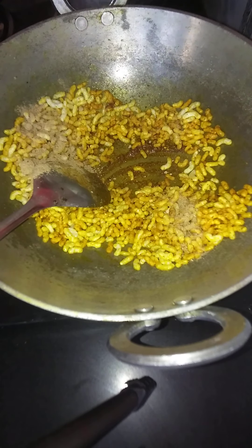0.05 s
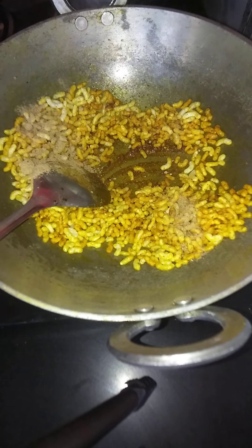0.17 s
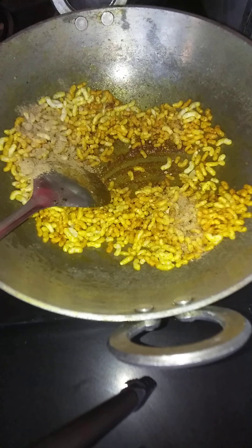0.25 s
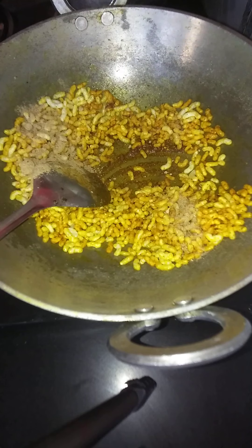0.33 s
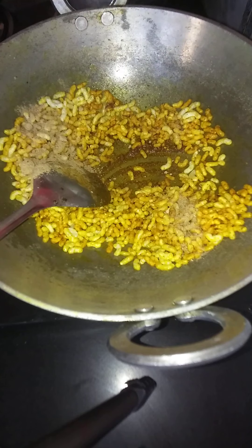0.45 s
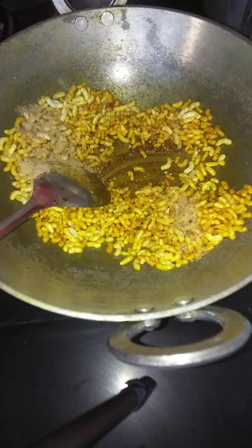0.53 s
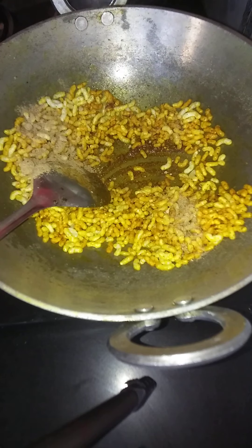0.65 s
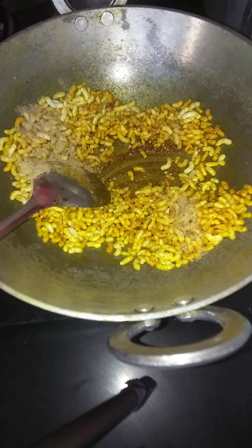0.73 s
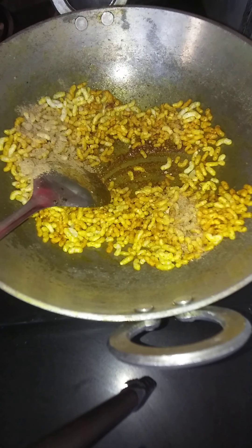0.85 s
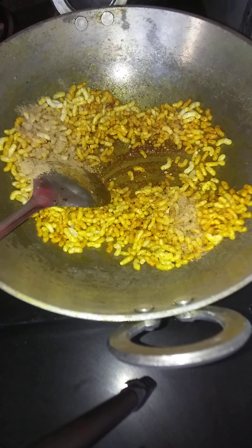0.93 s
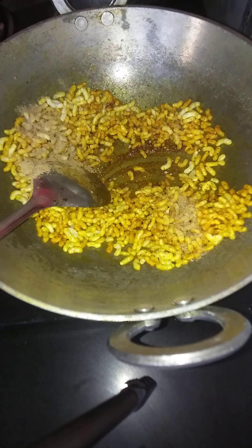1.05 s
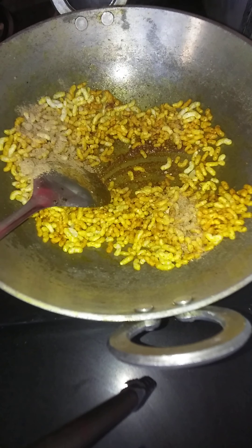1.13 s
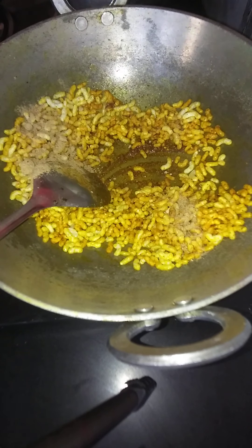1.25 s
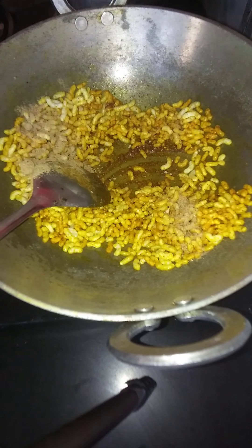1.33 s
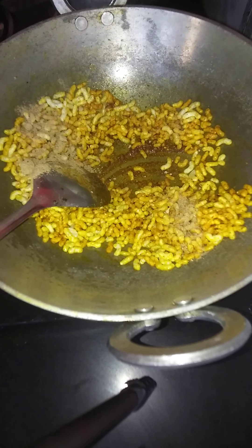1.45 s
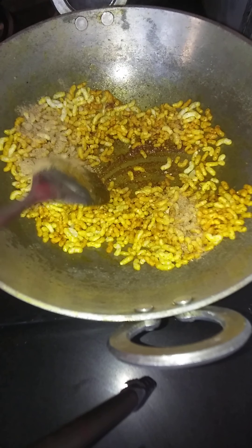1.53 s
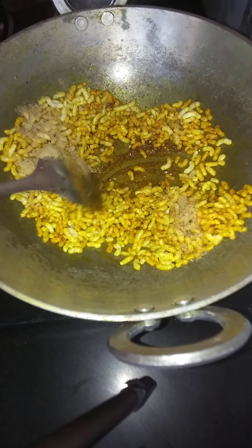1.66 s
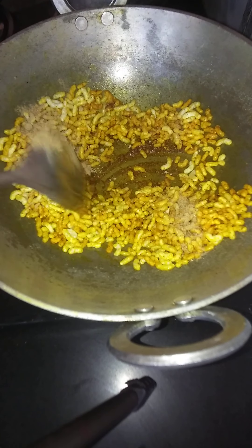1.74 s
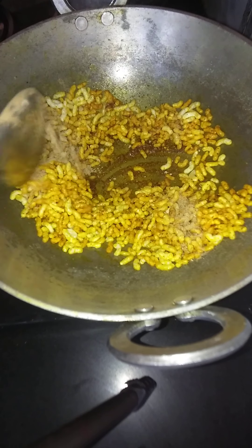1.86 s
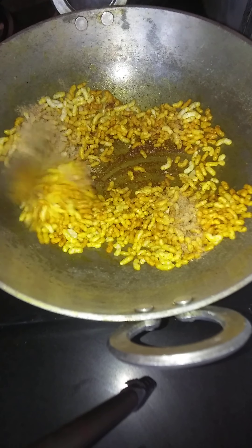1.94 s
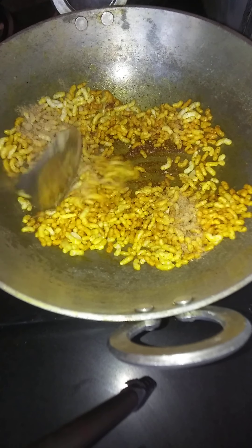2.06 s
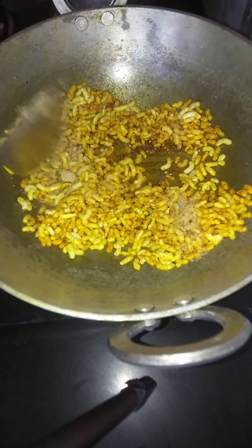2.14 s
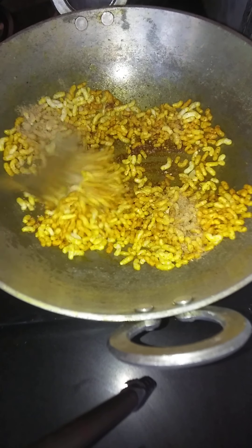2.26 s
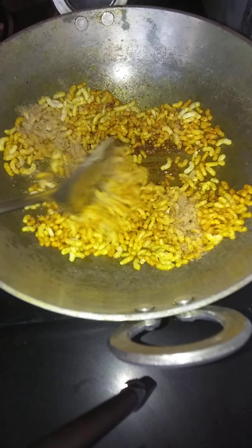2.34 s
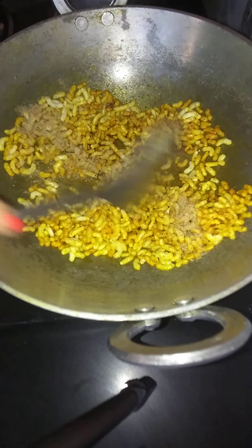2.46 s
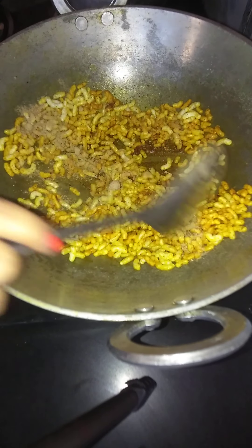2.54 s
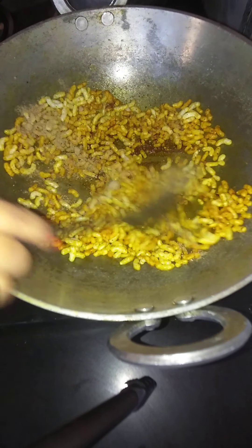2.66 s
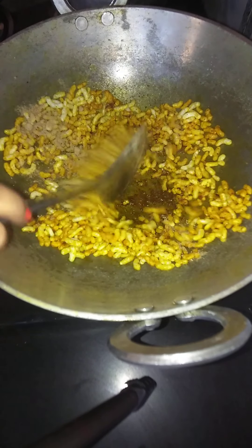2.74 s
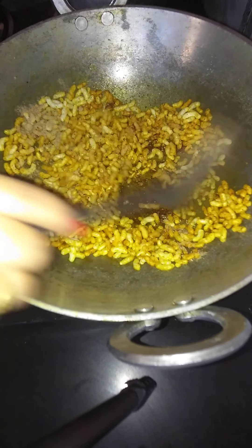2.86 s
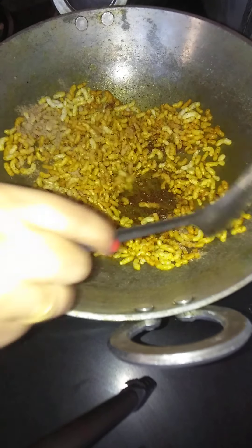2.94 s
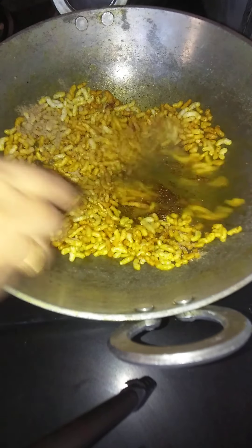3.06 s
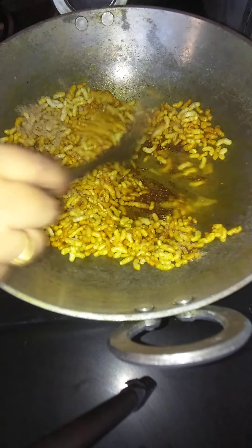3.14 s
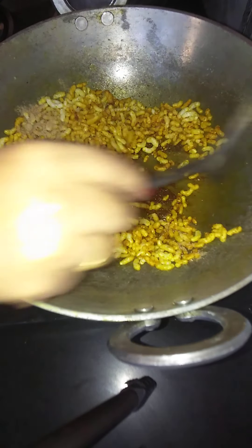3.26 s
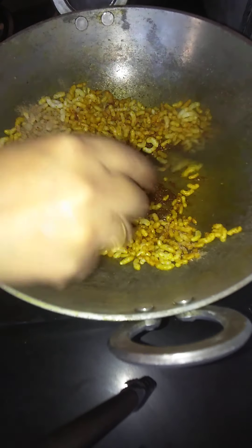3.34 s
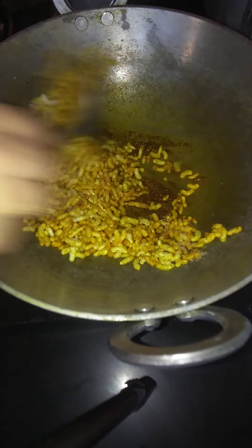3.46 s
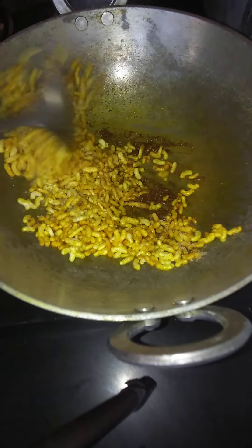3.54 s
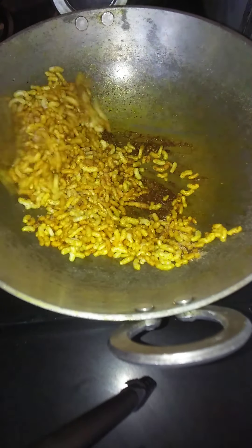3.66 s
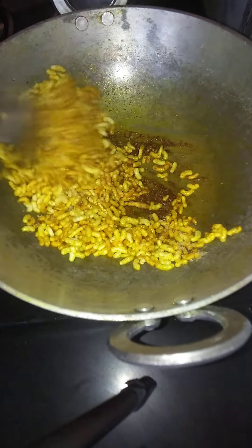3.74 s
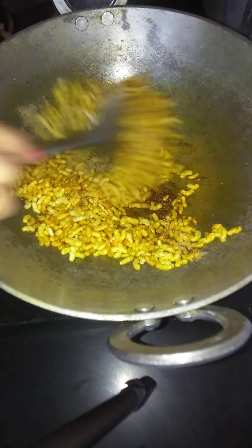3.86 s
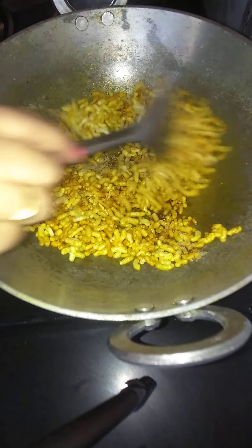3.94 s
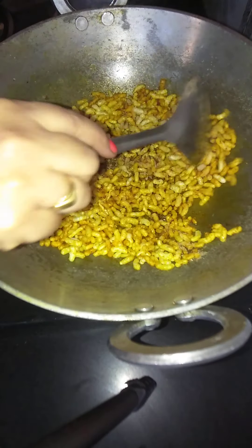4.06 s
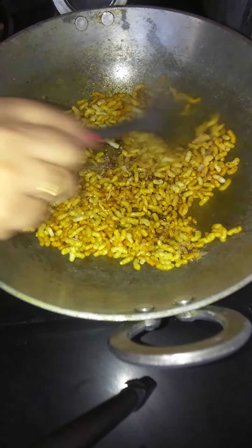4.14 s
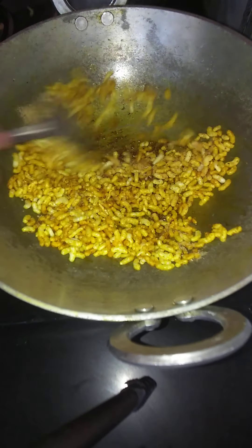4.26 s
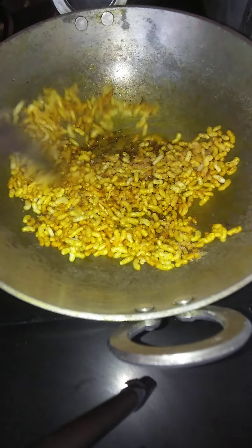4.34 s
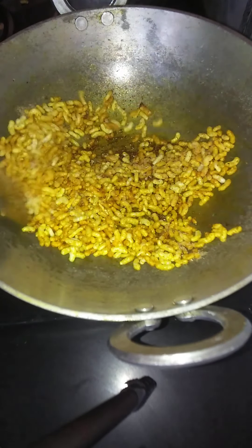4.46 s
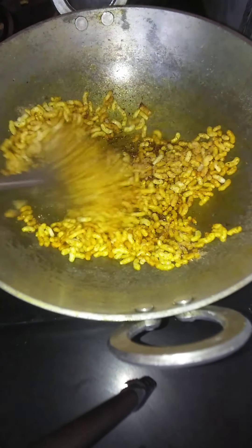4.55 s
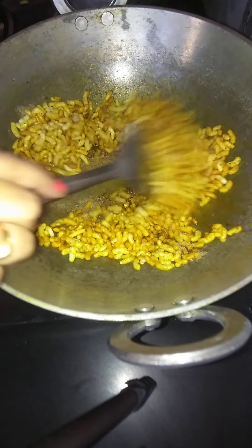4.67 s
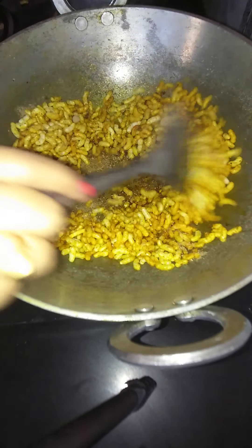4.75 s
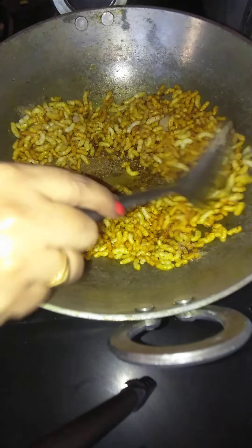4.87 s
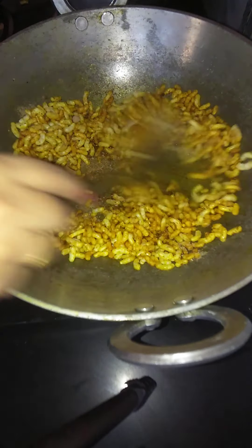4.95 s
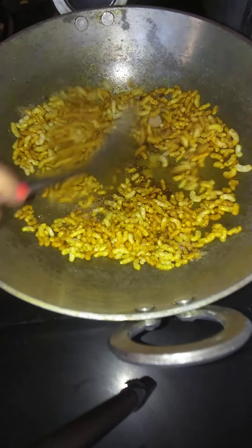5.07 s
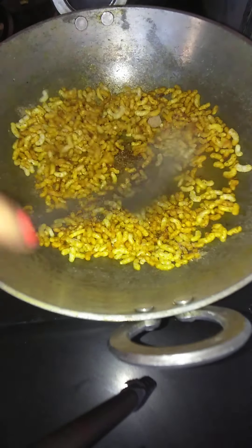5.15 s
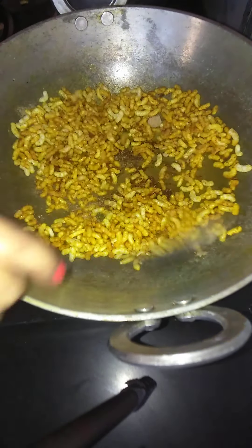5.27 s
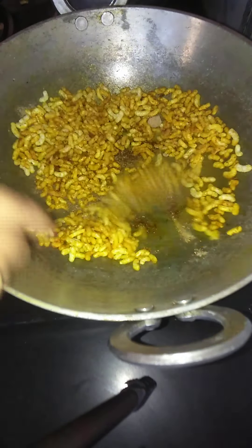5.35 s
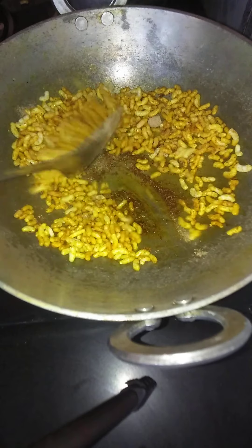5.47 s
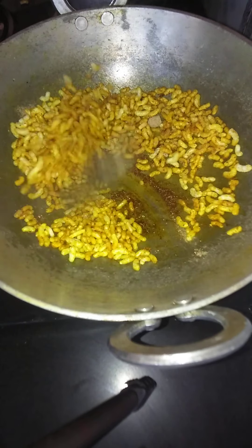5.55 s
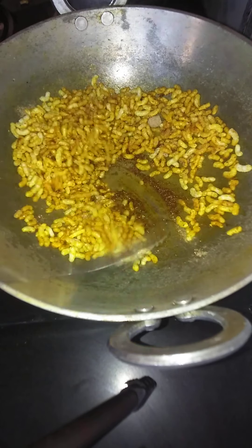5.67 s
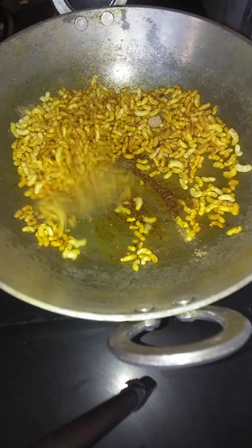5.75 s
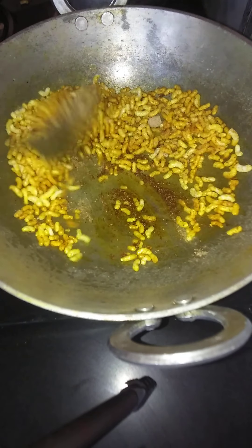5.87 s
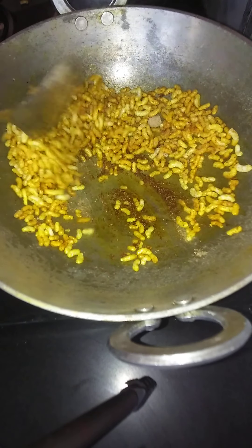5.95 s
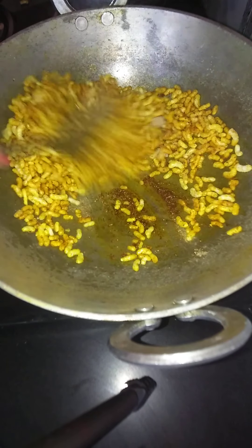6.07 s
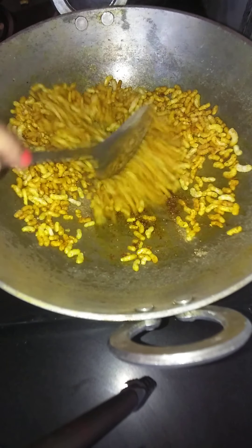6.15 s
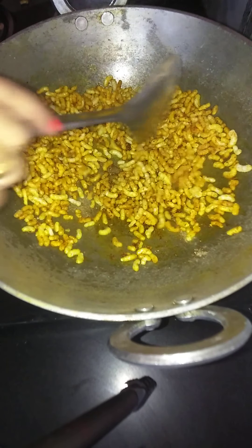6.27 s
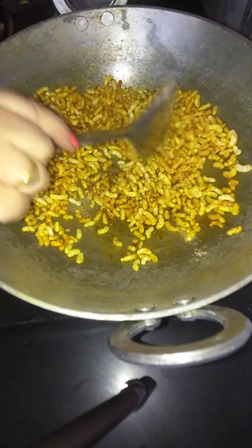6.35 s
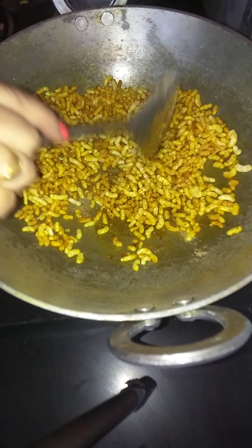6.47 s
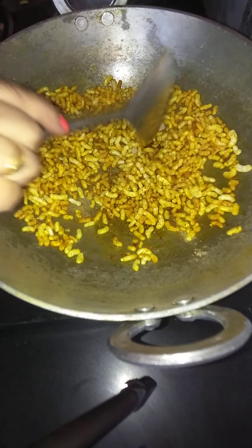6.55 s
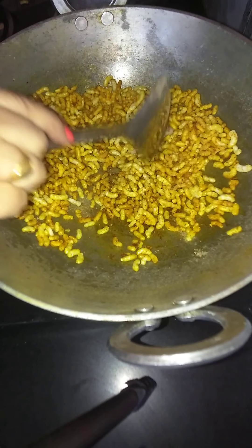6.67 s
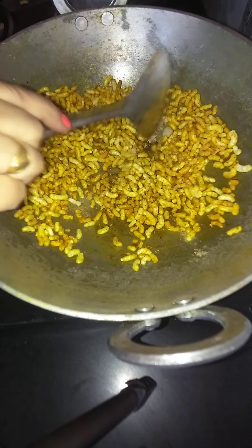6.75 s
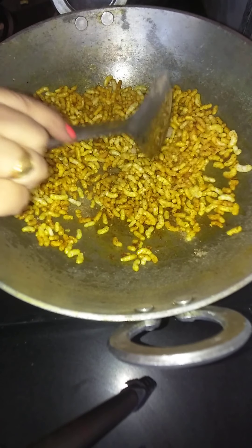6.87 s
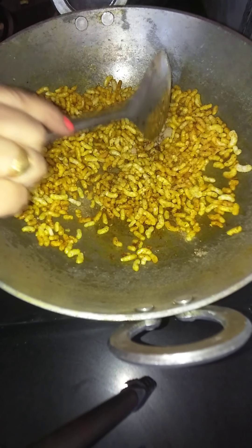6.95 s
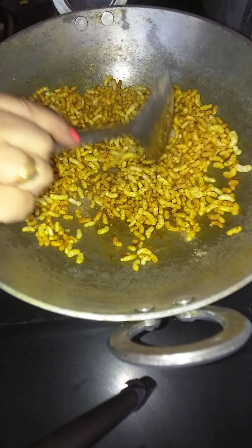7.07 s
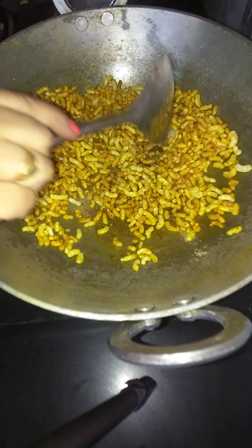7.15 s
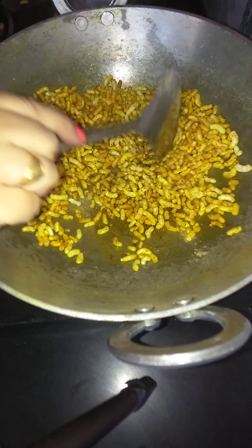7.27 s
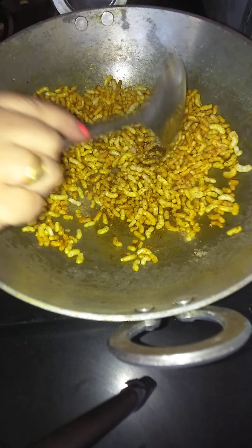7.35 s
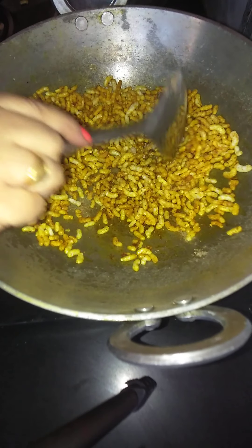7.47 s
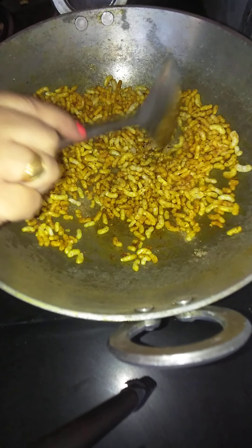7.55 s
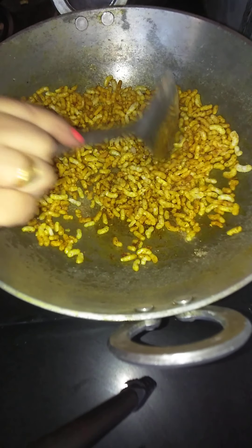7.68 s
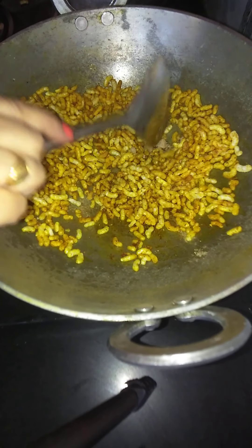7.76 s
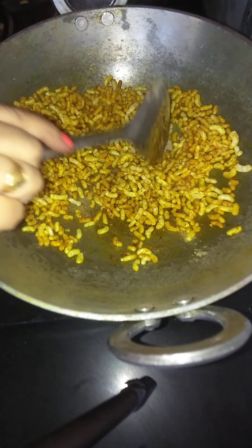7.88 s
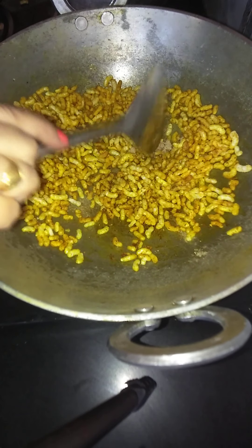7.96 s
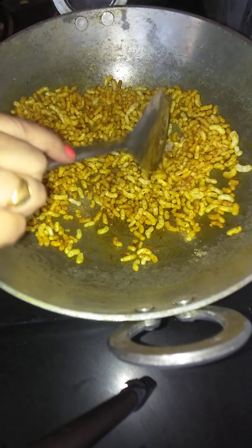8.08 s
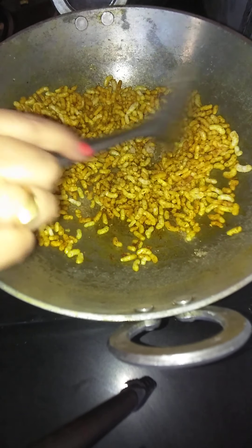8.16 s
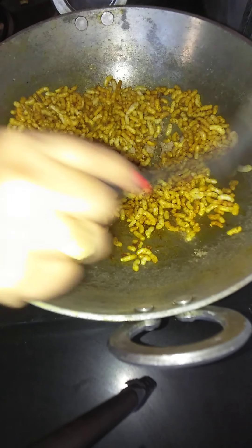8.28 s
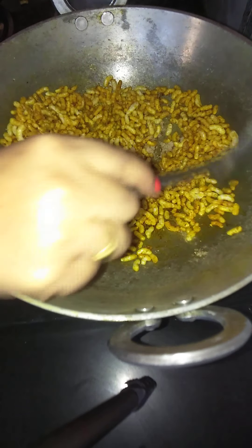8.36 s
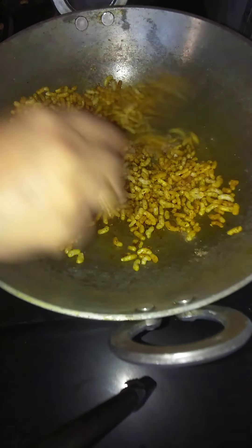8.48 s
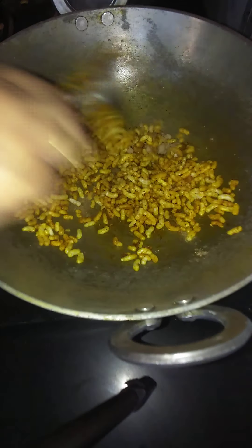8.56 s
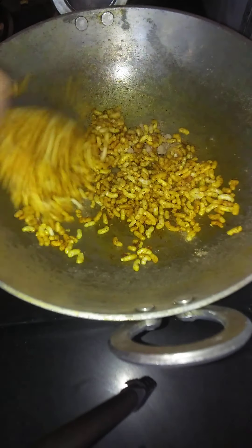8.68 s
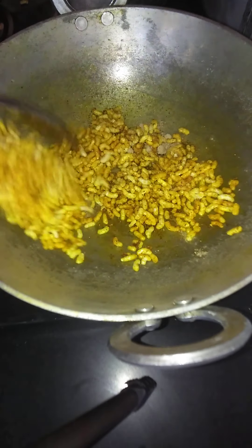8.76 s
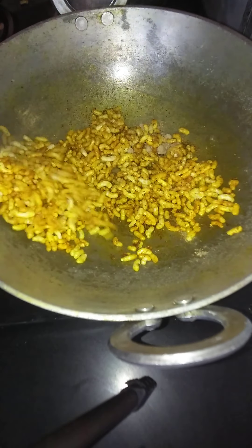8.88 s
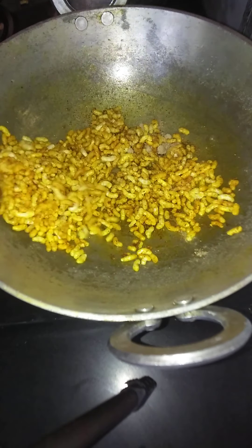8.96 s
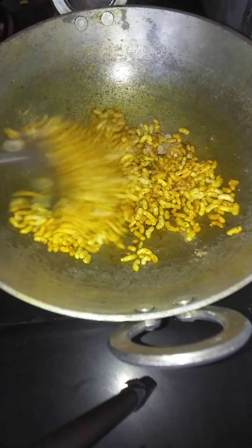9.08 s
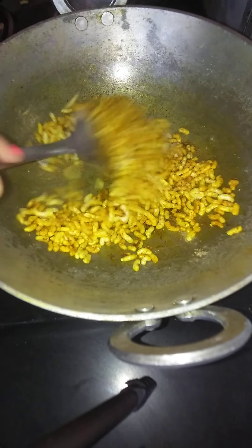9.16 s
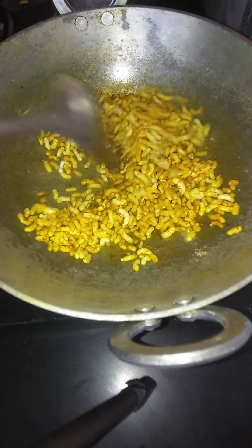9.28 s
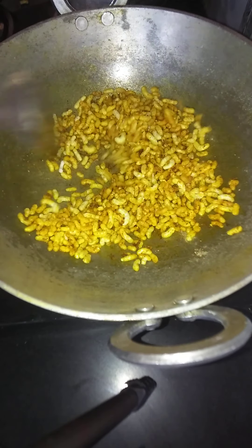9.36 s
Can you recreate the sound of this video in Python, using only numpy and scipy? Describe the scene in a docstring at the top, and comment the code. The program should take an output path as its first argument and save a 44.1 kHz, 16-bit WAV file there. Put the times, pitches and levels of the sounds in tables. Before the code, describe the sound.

Close view of a metal spoon in a wide steel pan of dry grains. Quiet taps come first, then a bright ringing clank around two seconds, followed by uneven scrapes and gritty swishes. After a tiny falling chirp a second hard clank lands past the middle, then quick dull taps and more stirring. A faint flame rumble and room hush sit beneath; small kitchen, narrow, muffled-treble phone microphone.

```python
"""A steel spoon stirs dry roasted grains in a deep metal pan on a gas ring, in a small kitchen.
From the start a soft hush (coloured noise) and the flame's rumble (noise ringing low modes) run on.
Over them the spoon knocks and drags: bursts and gritty contacts ring bowl, spoon, wall and grains.
One knock stands out near 2 s. At about 6.5 s comes a falling whistle, a tone sliding down in pitch,
and a strong knock lands as the whistle ends; the stirring goes on to the end."""
import sys
import numpy as np
from scipy import signal
from scipy.fft import rfft, irfft, next_fast_len
from scipy.io import wavfile
from scipy.ndimage import uniform_filter1d

SR = 44100
rng = np.random.default_rng(int(sys.argv[2]) if len(sys.argv) > 2 else 0)


def pcm_store(signal):
    """Save signal as 16-bit PCM."""
    levels = np.round(np.clip(np.atleast_2d(signal), -1, 1) * 32767)
    wavfile.write(sys.argv[1], SR, levels.astype(np.int16).T)


N = 415545   # length of the scene [samples]

# All levels here are starting points: each source adds its own trim and chance.
# Colour of the room hush: (frequency [Hz], relative level per Hz [dB])
HUSH_COLOUR = [(15, -55), (25, -23.5), (67, 5.5), (108, 1.5), (239, -12), (343, -18), (876, -13.5),
               (2980, -22.5), (3980, -23.5), (6280, -55.5), (7800, -50.5), (10100, -95.5), (17200, -120)]
# Strength of the gas flame: (time [s], level [dB])
FLAME_LEVEL = [(0, -61.5), (.25, -68), (.5, -51), (1.05, -55.5), (1.2, -70.5), (1.9, -56), (2.15, -43),
               (2.4, -64), (2.75, -60), (3.3, -59.5), (3.8, -57), (4.6, -51), (4.85, -59), (5.7, -49),
               (6.0, -55), (6.7, -44), (6.9, -54.5), (7.4, -55), (8.3, -52), (8.47, -43), (8.7, -75),
               (8.95, -57.5), (9.26, -46.5), (9.42, -62)]
# Modes of the air under the pan, before damping: (frequency [Hz], width [Hz], level [dB])
FLAME_MODES = [(69.6, 41, -22), (102, 45.7, 10.5), (127.6, 8.3, -0.5)]
# Falling whistle: (time [s], pitch [Hz], level [dB])
WHISTLE = [(6.51, 6570, -100), (6.525, 6300, -65), (6.57, 5210, -51.5), (6.61, 4200, -55.5),
           (6.66, 2780, -41.5), (6.675, 2450, -100)]
# How long the kitchen echo takes to fall by 60 dB: (frequency [Hz], time [s])
ECHO_TIMES = [(150, 0.65), (500, 0.39), (1500, 0.31), (4000, 0.39), (7500, 0.12)]
# Low modes of the pan bowl, damped by the food: (frequency [Hz], width [Hz], level [dB])
BOWL = [(223, 28, -2), (271.5, 33, 5), (308, 28, -6), (392.6, 31, 2), (509, 98, -11.5), (558, 70, -5.5),
        (668, 15, -10.5), (730, 27, -6), (885, 100, -4.5), (999, 58, -7.5), (1120, 51, -14.5)]
# Modes of the spoon: (frequency [Hz], width [Hz], level [dB])
SPOON = [(2180, 70, -15.5), (2740, 35, -16.5), (3305, 130, 0.5), (3843, 29, -8), (3966, 63, 4),
         (4144, 35, -6), (4960, 40, 1), (5020, 45, -11.5), (6014, 28, -7), (6090, 50, -9), (7200, 110, -14)]
# Modes of the bare pan wall: (frequency [Hz], width [Hz], level [dB])
WALL = [(2365, 35, -8.5), (2520, 45, -8.5), (3560, 27, -8.5), (3907, 50, -10), (4345, 35, -5.5),
        (4610, 25, -5.5), (5115, 56, 1.5), (5490, 44, -1.5), (5500, 77, -1.5), (5840, 36, -4),
        (6100, 33, -2), (6550, 55, -6.5), (7330, 150, -3)]
# Broad resonances of grains tumbling on steel: (frequency [Hz], width [Hz], level [dB])
GRAINS = [(645, 300, -0.5), (966, 220, -6), (1180, 550, 3), (1560, 840, -12), (2150, 300, -2.5),
          (2400, 820, -1), (2780, 400, -10), (3770, 170, -4), (4500, 150, -3.5), (5230, 1400, -17),
          (6700, 4100, -16)]
# Knocks: (time [s], crack peak [dB], bowl boom [dB], crack centre [Hz], spoon ring [dB],
#          wall ring [dB], contact [ms])
KNOCKS = [(0.035, -36, -63, 950, -80, -69, 14), (0.254, -21.5, -64, 760, -77, -81, 11),
          (0.541, -45, -69, 2900, -71, -87, 22), (0.85, -24, -61, 626, -49.5, -65, 10),
          (1.017, -22, -47, 1180, -50, -66, 12), (1.131, -43, -71, 2690, -54, -52.5, 3.2),
          (1.382, -20.5, -39.5, 1300, -52, -62, 6.7), (1.576, -30, -75, 2660, -54, -54, 13),
          (1.935, -56, -66, 1070, -51, -47.5, 7.8), (1.998, -33, -40.5, 896, -51, -51, 4.9),
          (2.038, -0.5, -22, 1010, -10, -50, 3.9), (2.323, -28, -44, 802, -50, -63, 13),
          (2.535, -45, -63.5, 860, -47, -53.5, 11), (2.734, -52, -48.5, 2500, -47, -62, 6),
          (2.823, -42, -56.5, 2900, -52, -50.5, 8.9), (3.195, -51.5, -69, 2180, -45, -39.5, 6.5),
          (3.362, -13, -26, 2310, -48.5, -26, 6.3), (3.678, -49, -47, 651, -64, -47, 5.1),
          (3.741, -31, -70, 2870, -46, -68, 6.9), (3.761, -28, -35, 923, -63, -70, 15),
          (3.968, -27.5, -84.5, 2330, -63, -70, 12), (4.018, -64, -50, 832, -52.5, -63, 7.7),
          (4.126, -29, -57, 2870, -51, -66, 5.7), (4.147, -35, -35, 1040, -50, -49.5, 3.9),
          (4.164, -28, -30, 950, -67, -70, 8.6), (4.228, -26.5, -36, 990, -49.5, -51, 14),
          (4.496, -40, -46.5, 896, -68, -41, 6), (4.566, -15.5, -27.5, 1040, -36.5, -32, 11),
          (4.912, -47, -38.5, 800, -55.5, -65, 13), (4.999, -45.5, -42, 800, -58, -58, 10.4),
          (5.125, -56.5, -45, 636, -80.5, -81, 5.1), (5.306, -16.5, -33, 2130, -41, -32.5, 15),
          (5.712, -11.5, -25.5, 780, -47, -30, 6.3), (5.725, -23, -26, 720, -43, -35, 8.8),
          (6.112, -60.5, -43, 840, -62, -49, 5.5), (6.405, -29.5, -35.5, 1570, -39, -42, 8.2),
          (6.661, -3, -16, 696, -20.5, -19.5, 9.3), (6.994, -52, -44.5, 855, -61, -75.5, 13),
          (7.073, -26, -21.5, 724, -41.5, -66.5, 1.9), (7.109, -33, -38.5, 708, -56, -78, 9.5),
          (7.209, -45.5, -47.5, 616, -59, -69, 6.5), (7.285, -45, -34.5, 920, -49.5, -68, 4.2),
          (7.367, -33.5, -38.5, 890, -54.5, -72, 7.9), (7.463, -50, -36, 740, -45.5, -46, 3.6),
          (7.51, -35.5, -38.5, 799, -76.5, -73, 8.3), (7.565, -38, -44, 1500, -69, -77, 7.4),
          (7.659, -13.5, -21, 727, -38, -45, 10.4), (7.754, -34, -38, 692, -63, -73, 6.4),
          (7.863, -42.5, -38, 786, -50.5, -54.5, 5.3), (7.96, -38, -43, 842, -65, -74, 9.5),
          (8.064, -19, -20.5, 716, -36, -45.5, 4.4), (8.165, -37, -45, 1500, -61, -65, 7),
          (8.287, -42, -46.5, 1034, -67, -70, 7.5), (8.369, -15, -22.5, 2450, -32.5, -33.5, 13),
          (8.644, -13.5, -34.5, 1090, -51, -33.5, 3.6), (8.914, -66.5, -75, 705, -51.5, -74, 4.1),
          (9.039, -34.5, -65, 880, -44.5, -60.5, 6.5), (9.088, -23, -31, 611, -40, -37.5, 7.3),
          (9.137, -25, -34, 1080, -23, -52, 12)]
# Strokes of the spoon: (start [s], rise [s], hold [s], bowl boom [dB], grain rattle [dB],
#                        spoon ring [dB], wall ring [dB])
STROKES = [(0.252, .01, 0.02, -62, -60, -85, -85), (0.84, 0.031, 0.015, -41.5, -44.5, -52.5, -77),
           (0.995, 0.016, 0.029, -48, -45.5, -47.5, -78), (1.62, 0.039, 0.21, -60, -64.5, -72, -86),
           (1.924, 0.073, 0.038, -43, -51, -56, -54), (2.043, 0.0096, 0.047, -32, -28.5, -29.5, -53),
           (2.239, 0.031, 0.08, -46, -51.5, -50, -59.5), (2.633, 0.029, 0.097, -54, -53, -47.5, -53.5),
           (2.958, .05, .14, -46, -51, -52.5, -55), (3.364, 0.034, 0.056, -30, -39.5, -37, -33),
           (3.723, 0.039, 0.045, -37, -45.5, -49.5, -56), (3.8, 0.02, 0.16, -53, -59, -58, -57.5),
           (4.004, 0.023, 0.029, -53, -56, -65, -68), (4.117, 0.019, 0.044, -38.5, -44.5, -58, -58),
           (4.201, 0.037, 0.021, -35.5, -48, -51.5, -52.5), (4.35, 0.042, 0.037, -61, -64, -73.5, -66.5),
           (4.474, 0.022, 0.034, -38.5, -50.5, -67, -49), (4.557, 0.035, 0.012, -31, -31.5, -25.5, -47),
           (4.716, 0.023, 0.04, -46, -54.5, -64.5, -59), (4.86, .04, .13, -41, -55.5, -52, -54.5),
           (5.29, 0.056, 0.048, -40.5, -42, -32.5, -40.5), (5.362, 0.018, 0.018, -51, -58, -33, -44.5),
           (5.538, 0.017, 0.013, -47.5, -80, -72.5, -52.5), (5.706, 0.0088, 0.062, -56, -43, -39, -44.5),
           (5.906, 0.014, 0.034, -50, -64.5, -65, -78.5), (6.014, 0.021, 0.18, -54, -61.5, -55, -61),
           (6.675, 0.011, 0.039, -34, -37, -46.5, -43), (6.802, 0.027, 0.034, -39.5, -57.5, -61.5, -61),
           (7.077, 0.014, 0.047, -37, -61, -69.5, -78), (7.247, 0.037, 0.035, -37, -48.5, -74, -72),
           (7.427, 0.022, 0.026, -37.5, -49.5, -63, -70.5), (7.672, 0.012, 0.023, -33, -46, -57.5, -73),
           (7.848, 0.015, 0.055, -39, -62.5, -74, -77.5), (8.075, 0.021, 0.048, -34.5, -63.5, -78, -73),
           (8.368, 0.049, 0.14, -30, -39, -45, -33), (8.67, 0.012, 0.048, -61.5, -58.5, -65, -48.5),
           (9.013, 0.017, 0.046, -56, -59, -57, -56.5), (9.089, 0.037, 0.0095, -38.5, -32.5, -29, -38),
           (9.23, 0.025, 0.021, -55, -75, -61, -63), (9.367, 0.0084, 0.016, -64, -83, -66.5, -67.5)]
# The next four lists each hold: (bowl boom, grain rattle, spoon ring, wall ring)
# How fast a stroke dies away after its hold: [dB per s]
RELEASE_DB_PER_S = [155, 191.6, 200, 208]
# A knock leaves food and steel stirring, at this level next to the knock: [dB]
AFTER_KNOCK_DB = [-3.5, -21.5, -17.5, -10]
# How fast that stir settles: [dB per s]
SETTLE_DB_PER_S = [300, 300, 300, 300]
# Food shifting between strokes: [dB]
REST_DB = [-62.5, -72.5, -81, -79]

RISE_FROM_DB = -26           # a stroke swells from this far below its level
SWELL_IN_DB_PER_S = 1499     # each knock's layers swell in steeply just ahead of it


def from_db(db):
    """Turns dB into a gain."""
    return 10 ** (np.asarray(db) / 20)


def rms_one(x):
    """Scales a sound to an average strength (rms) of 1."""
    return x / np.sqrt(np.mean(x ** 2) + 1e-20)


def in_time(rows):
    """Reads the columns of a timed table at every sample, joined by straight lines."""
    times, *columns = np.transpose(rows)
    return [np.interp(np.arange(N) / SR, times, column) for column in columns]


def coloured(x, spectrum):
    """Filters x by a spectrum of (frequency [Hz], level [dB]) points."""
    hz, db = np.transpose(spectrum)
    size = next_fast_len(len(x))
    grid = np.fft.rfftfreq(size, 1 / SR) + 1   # the 1 avoids the log of zero
    gain = from_db(np.interp(np.log(grid), np.log(hz), db))
    return irfft(rfft(x, size) * gain, size)[:len(x)]


def mellow(x, top_hz):
    """Rolls off the treble: a large soft-backed body gives off little above its top mode."""
    return signal.sosfilt(signal.butter(4, top_hz, fs=SR, output="sos"), x)


def drift(rate):
    """Slow chance with spread 1: random points, rate a second, joined smoothly."""
    steps = np.arange(0, N, 16) * rate / SR   # one value every 16 samples
    points = rng.standard_normal(N // 100)
    k = steps.astype(int)
    part = np.sin(steps % 1 * np.pi / 2)
    joined = points[k] * np.sqrt(1 - part ** 2) + points[k + 1] * part
    return np.repeat(joined, 16)[:N]


def ring(push, hz, width_hz):
    """One mode: a unit click sets a wave of height 1 ringing; a wider mode dies faster."""
    radius = np.exp(-np.pi * width_hz / SR)
    turn = 2 * np.pi * hz / SR
    feedback = [1, -2 * radius * np.cos(turn), radius * radius]
    return signal.lfilter([.5, 0, -.5], feedback, push + 1e-18)


def grit(per_s, uneven_db):
    """Random tiny contacts of uneven size; rms 1."""
    luck = np.minimum(rng.exponential(1, N), 5)
    sizes = from_db(uneven_db * luck) * rng.choice([-1, 1], N)
    return rms_one(sizes * (rng.random(N) < per_s / SR))


def rubbed(modes, contacts, level_db, wander_db, wander_rate, damping):
    """Contacts drive every mode, widened or narrowed by damping; power wanders from mode to mode."""
    shares = np.array([from_db(db + wander_db * drift(wander_rate)) for hz, width, db in modes])
    shares *= from_db(level_db) / np.sqrt(np.sum(shares ** 2, axis=0))   # total power follows level_db
    out = np.zeros(N)
    for k, (hz, width, db) in enumerate(modes):
        own = np.roll(contacts, 977 * k)   # each mode feels the contacts at another moment
        damped_hz = width * damping
        even_out = np.sqrt(4 * np.pi * damped_hz / SR)   # makes wide and narrow modes equally strong
        out += ring(own * shares[k], hz, damped_hz) * even_out
    return out


def bursts(rise_s, fall_s):
    """One row of noise for each knock, rising and dying away."""
    t = np.arange(3000) / SR
    shape = (1 - np.exp(-t / rise_s)) * np.exp(-t / np.reshape(fall_s, (-1, 1)))
    return rng.standard_normal((len(KNOCKS), len(t))) * shape


def struck(modes, level_db, spread_db, chatter):
    """Each knock is a brief chatter that strikes every mode with a strength of its own."""
    steps = np.arange(chatter.shape[1])
    at = (np.array(KNOCKS)[:, :1] * SR).astype(int) + steps
    luck = np.clip(rng.standard_normal((len(at), len(modes))), -2, 1)
    typical = np.sqrt(np.sum(chatter ** 2, axis=1))
    out = np.zeros(N)
    for k, (hz, width, db) in enumerate(modes):
        # how much of the chatter the mode takes up
        felt = np.abs(chatter @ np.exp(2j * np.pi * hz / SR * steps))
        wanted = from_db(level_db + db + spread_db * luck[:, k])
        strength = wanted / np.maximum(felt, typical / 2)
        push = np.zeros(N)
        np.add.at(push, at, chatter * strength[:, None])
        out += ring(push, hz, width)
    return out


def hush():
    """Room hush: noise with a fixed colour whose level drifts a little."""
    level = from_db(-61 + 1.0 * drift(11.0))
    return level * rms_one(coloured(rng.standard_normal(N), HUSH_COLOUR))


def flame():
    """Turbulent burning excites the air gap under the pan in lumps."""
    level_db, = in_time(FLAME_LEVEL)
    lumps = from_db(4.2 * drift(14.) + 0.64 * drift(6.))
    puffs = lumps * rng.standard_normal(N)
    rumble = rubbed(FLAME_MODES, puffs, level_db, wander_db=1.5, wander_rate=11.0, damping=0.87)
    return mellow(rumble, top_hz=188)


def whistle():
    """A pure tone slides down in pitch while its loudness wavers."""
    hz, db = in_time(WHISTLE)
    loudness = from_db(db + 4.5 * drift(60.)) * (db > -89)   # silent outside the whistle
    return loudness * np.sin(2 * np.pi * np.cumsum(hz) / SR)


def kitchen(x, first_s):
    """Diffuse echo: noise that dies band by band, growing in until the first wall answers."""
    t = np.arange(SR // 2) / SR
    edges = 100 * 2 ** np.arange(0, 6.6, .5)   # half-octave bands [Hz]
    hz, t60 = np.transpose(ECHO_TIMES)
    tail = np.zeros(len(t))
    for low, high in zip(edges, edges[1:]):
        band = signal.butter(2, [low, high], "band", fs=SR, output="sos")
        band_t60 = np.interp(np.log(low * high) / 2, np.log(hz), t60)
        tail += signal.sosfilt(band, rng.standard_normal(len(t))) * from_db(-60 * t / band_t60)
    tail *= np.clip(t / first_s, 0, 1) ** 2
    return signal.fftconvolve(x, tail / np.sqrt(np.sum(tail ** 2)))[:N]


def effort():
    """Levels [dB] of boom, rattle, spoon and wall: strokes swell, hold and release; knocks add a stir."""
    t = np.arange(0, N / SR, .002)
    start, rise, hold, *stroke_db = np.transpose(STROKES)[:, :, None]
    s, crack_db, boom_db, crack_hz, spoon_db, wall_db, contact_ms = np.transpose(KNOCKS)[:, :, None]
    rising_db = RISE_FROM_DB * np.clip(1 - (t - start) / rise, 0, 1)
    swell_db = np.where(t < start, -200, rising_db)
    past_hold = np.maximum(t - start - rise - hold, 0)
    since = t - s   # time since each knock, negative before it
    levels = []
    # the grain rattle takes its knock level from the boom
    for k, knock_db in enumerate([boom_db, boom_db, spoon_db, wall_db]):
        strokes = from_db(stroke_db[k] + swell_db - RELEASE_DB_PER_S[k] * past_hold)
        fade_db = np.where(since > 0, SETTLE_DB_PER_S[k], SWELL_IN_DB_PER_S) * np.abs(since)
        stirs = from_db(knock_db + AFTER_KNOCK_DB[k] - fade_db)
        power = np.sum(strokes ** 2, axis=0) + np.sum(stirs ** 2, axis=0) + from_db(REST_DB[k]) ** 2
        levels.append(np.interp(np.arange(N) / SR, t, 10 * np.log10(power)))
    return levels


def drag():
    """The spoon edge slides over steel in uneven slips and pushes the grains before it."""
    boom_db, rattle_db, spoon_db, wall_db = effort()
    slips = from_db(2.0 * drift(60.))
    scratch = slips * grit(per_s=1800., uneven_db=4.0)
    tumble = slips * grit(per_s=2000., uneven_db=3.0)
    # clumps of food drop back on the bowl
    heaves = from_db(3.94 * drift(28.)) * grit(per_s=260.0, uneven_db=2.0)
    boom = rubbed(BOWL, heaves, boom_db - 9.0, wander_db=9.0, wander_rate=22., damping=0.97)
    spoon = rubbed(SPOON, scratch, spoon_db - 1.5, wander_db=5.0, wander_rate=22.0, damping=1.4)
    wall = rubbed(WALL, scratch, wall_db, wander_db=5.5, wander_rate=25.0, damping=1.6)
    rattle = rubbed(GRAINS, tumble, rattle_db - 4.0, wander_db=6.5, wander_rate=40.0, damping=0.73)
    return mellow(boom, top_hz=1250) + spoon + wall + rattle


def knocks():
    """A crack with its own pitch and length, then the ring of bowl, spoon and wall."""
    s, crack_db, boom_db, crack_hz, spoon_db, wall_db, contact_ms = np.transpose(KNOCKS)
    fall_s = contact_ms / 1000
    chatter = bursts(rise_s=0.012, fall_s=.8 * fall_s)
    thump = bursts(rise_s=0.0001, fall_s=1.5 * fall_s)
    out = mellow(struck(BOWL, boom_db - 8.0, spread_db=3.5, chatter=thump), top_hz=1300)
    out += struck(SPOON, spoon_db - 3.5, spread_db=2.5, chatter=chatter)
    out += struck(WALL, wall_db - 4.5, spread_db=3.0, chatter=chatter)
    # each crack dies away over its own contact time
    for start, db, hz, puff in zip(s, crack_db, crack_hz, bursts(rise_s=0.002, fall_s=fall_s)):
        band = signal.butter(3, [hz / 2.3, hz * 2.24], "band", fs=SR, output="sos")
        crack = signal.sosfilt(band, puff)
        peak = np.sqrt(uniform_filter1d(crack ** 2, size=88).max())   # strongest 2 ms
        i = int(start * SR)
        out[i:i + len(puff)] += from_db(db - 17.0) * crack / peak
    return out


def scene():
    """Pan sounds close by, the falling whistle with a full echo, all over flame and hush."""
    # no deep bass comes from the pan
    no_bass = signal.butter(4, 200, "high", fs=SR, output="sos")
    pan = signal.sosfilt(no_bass, drag() + knocks())
    falling = whistle()
    echo = kitchen(from_db(-18.5) * pan + falling, first_s=0.0034)
    return (hush() + flame() + falling + echo + pan)[None]


def record(dry):
    """A narrow voice channel: no deep bass, treble slopes off, then is cut steeply."""
    thin = signal.sosfilt(signal.butter(4, 55, "high", fs=SR, output="sos"), dry)
    sloped = signal.sosfilt(signal.butter(8, 7350, fs=SR, output="sos"), thin)
    # 60 dB down from 8030 Hz upward
    return signal.sosfilt(signal.cheby2(12, 60, 8030, fs=SR, output="sos"), sloped)


dry = scene()
out = record(dry)
pcm_store(out)
```